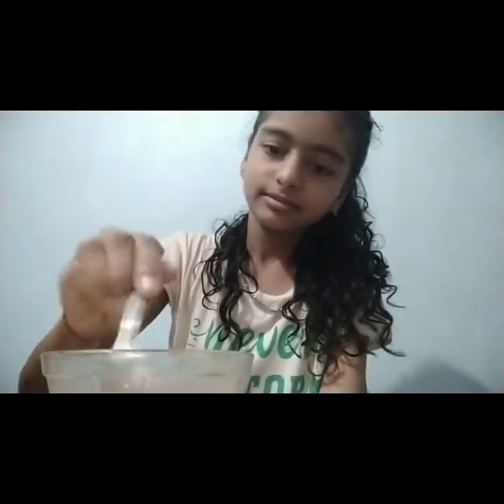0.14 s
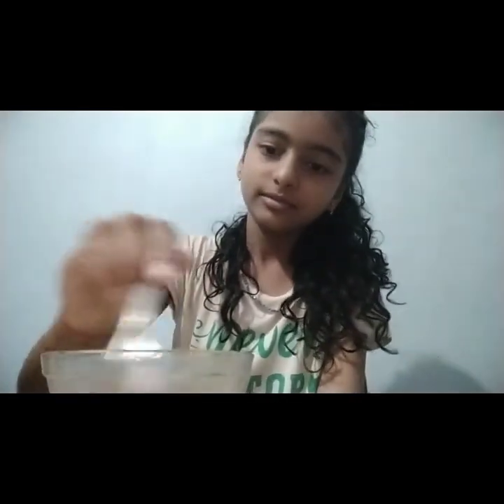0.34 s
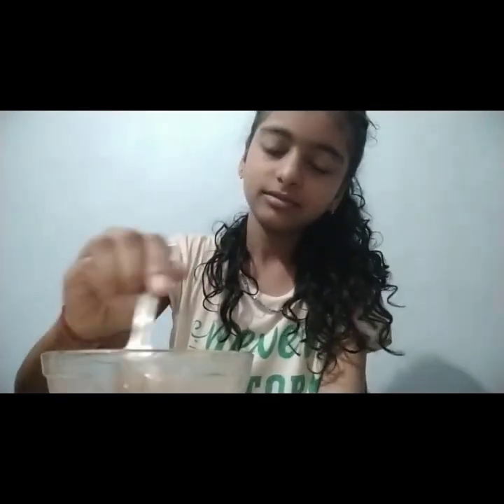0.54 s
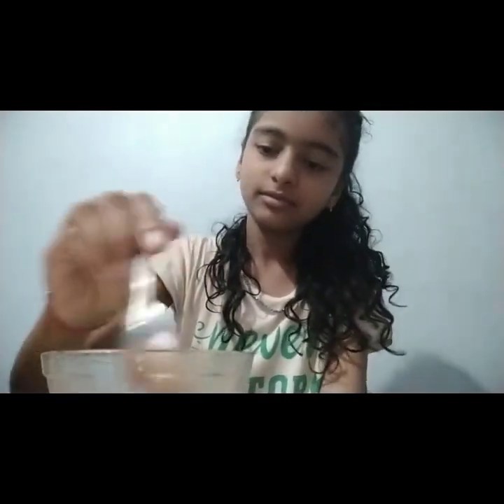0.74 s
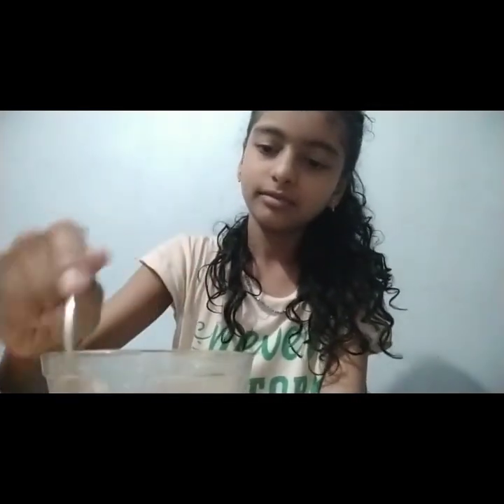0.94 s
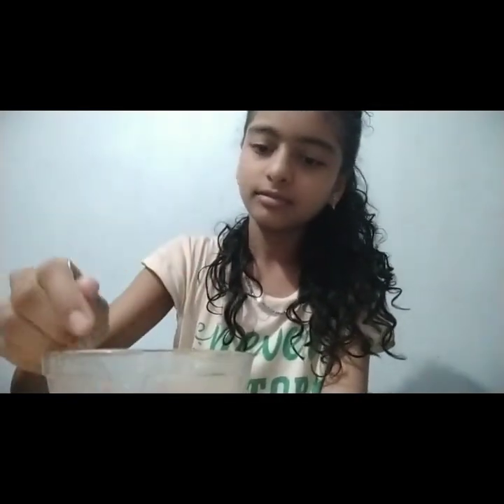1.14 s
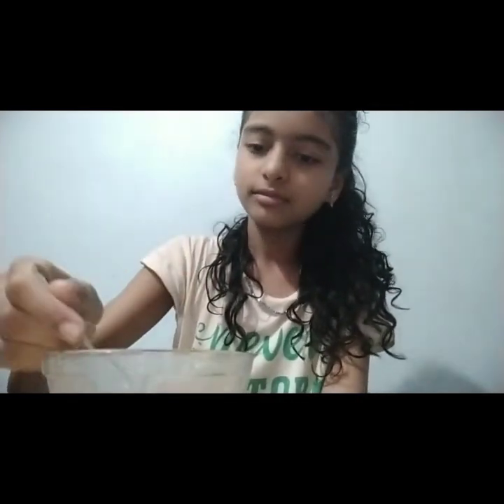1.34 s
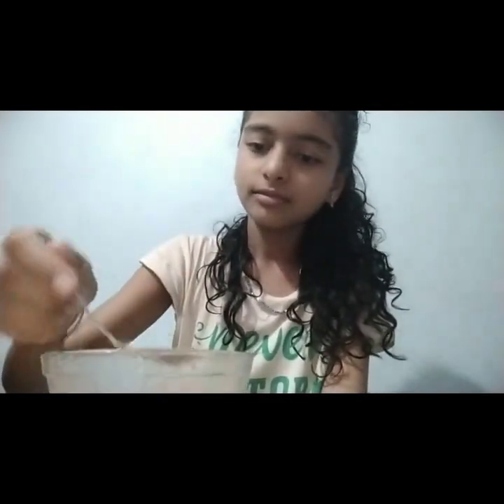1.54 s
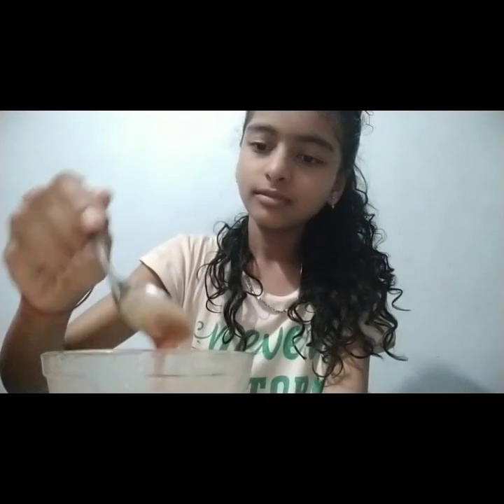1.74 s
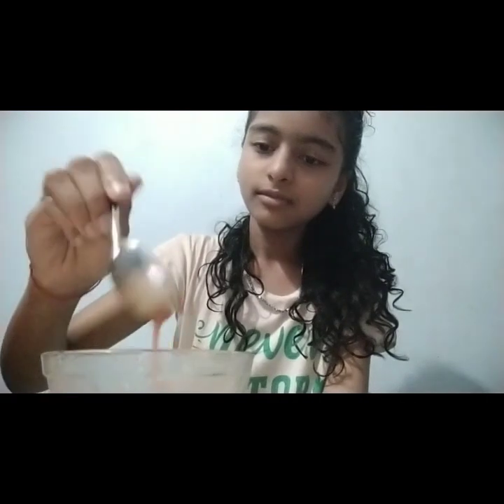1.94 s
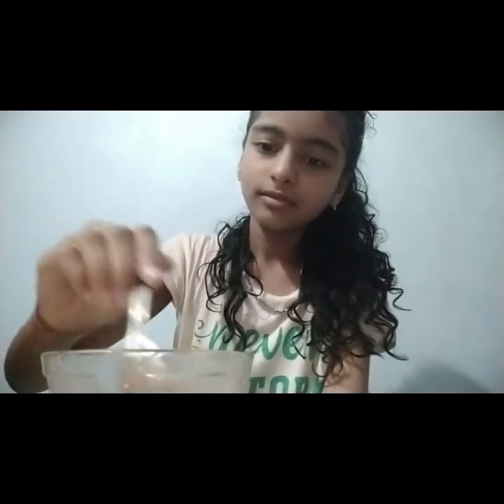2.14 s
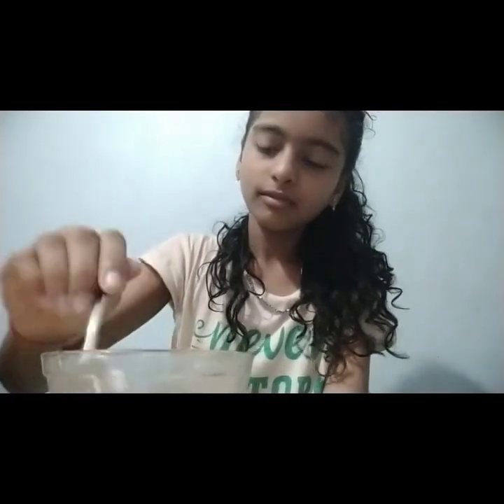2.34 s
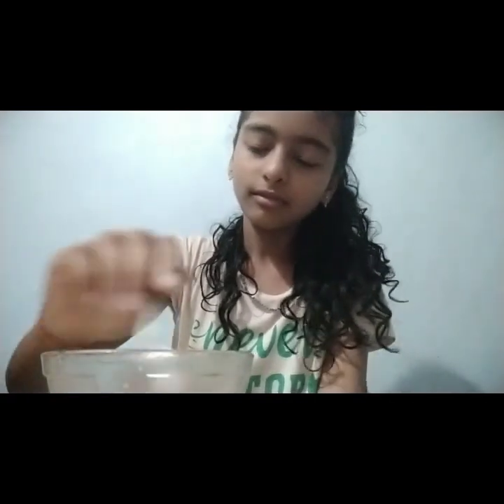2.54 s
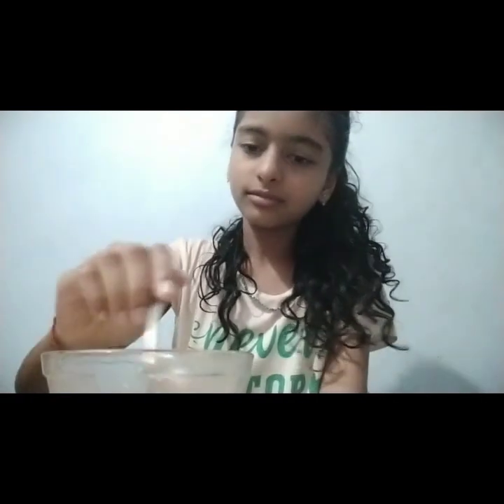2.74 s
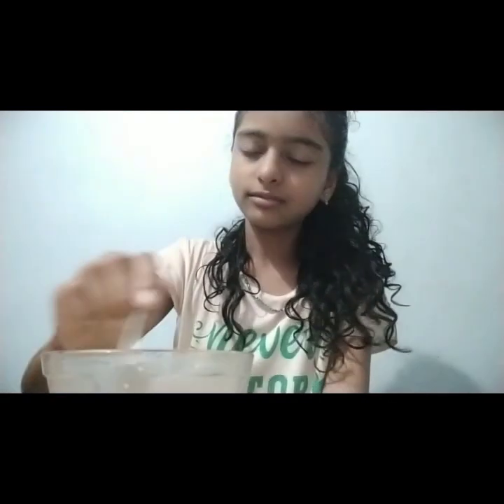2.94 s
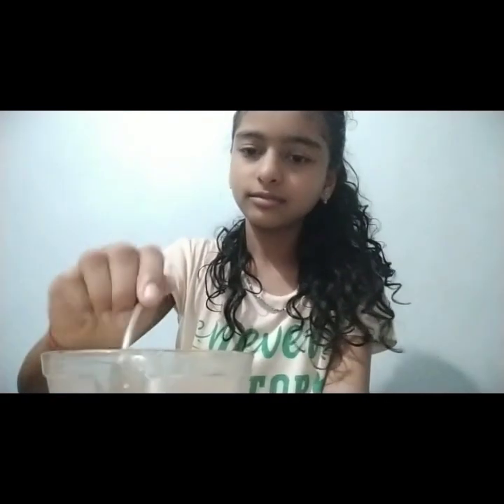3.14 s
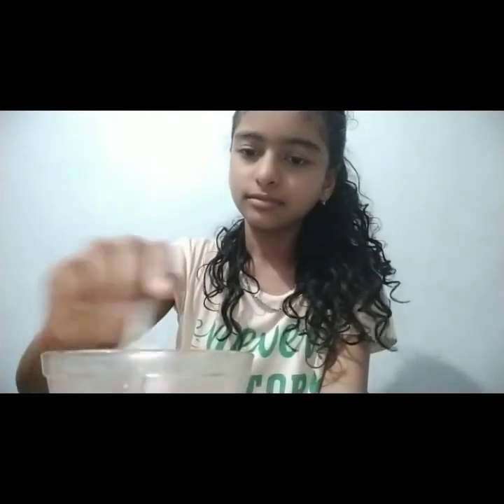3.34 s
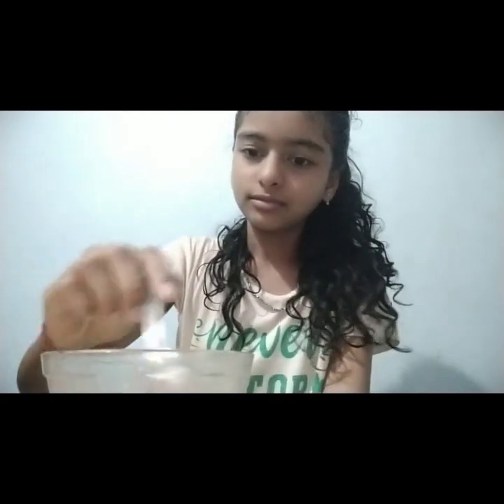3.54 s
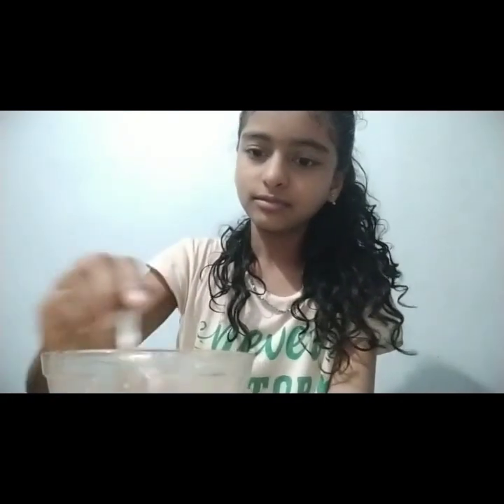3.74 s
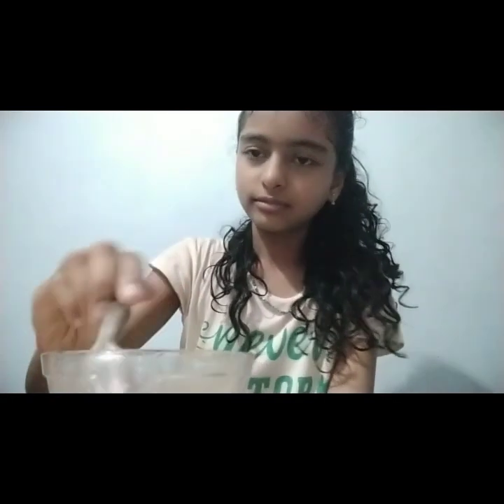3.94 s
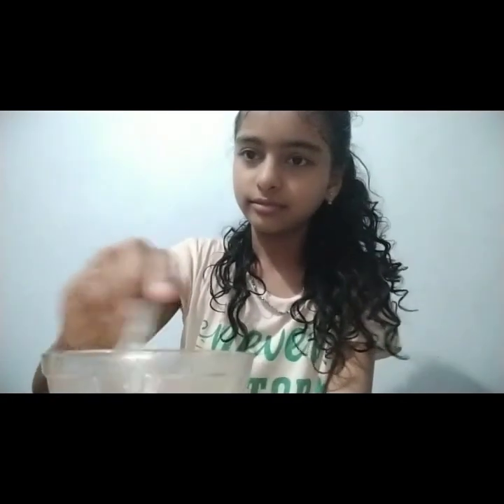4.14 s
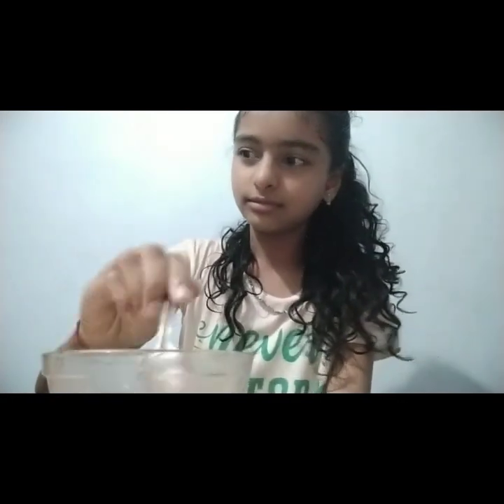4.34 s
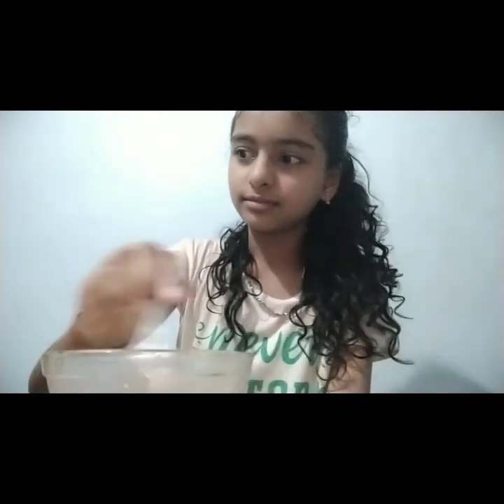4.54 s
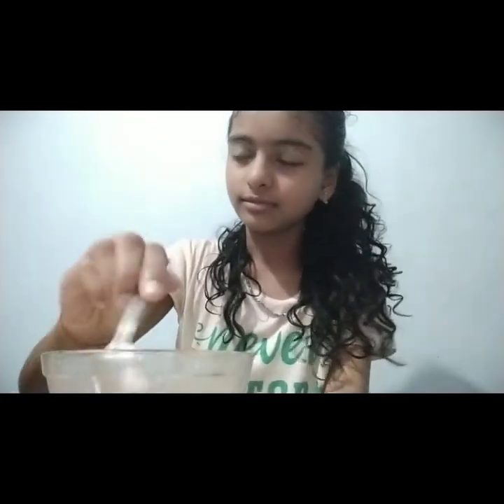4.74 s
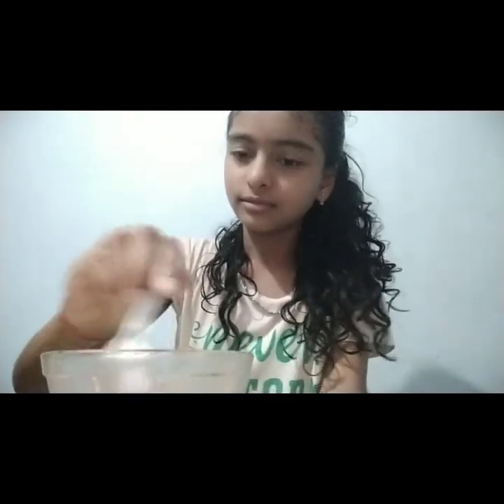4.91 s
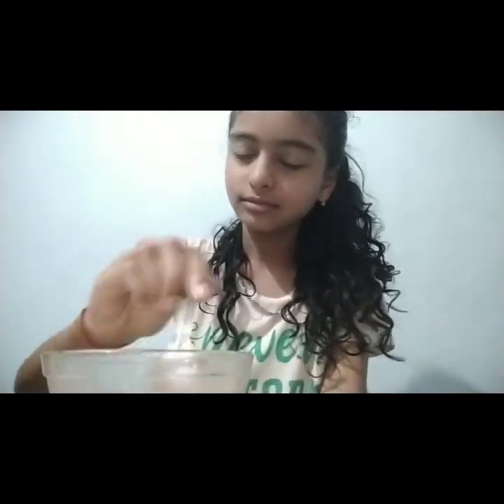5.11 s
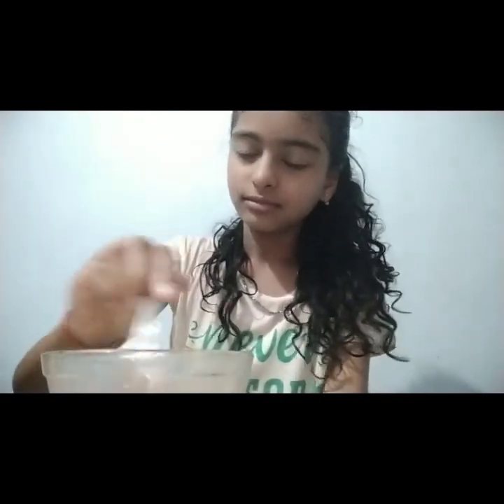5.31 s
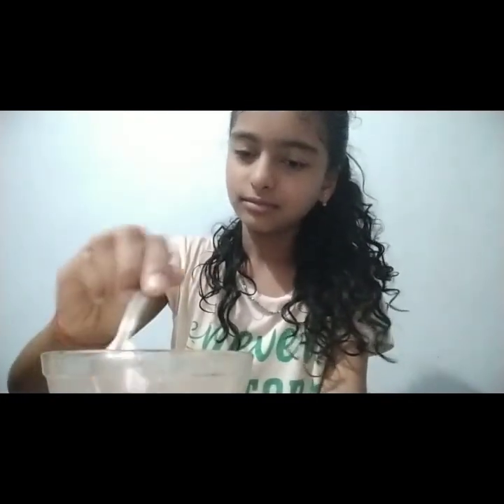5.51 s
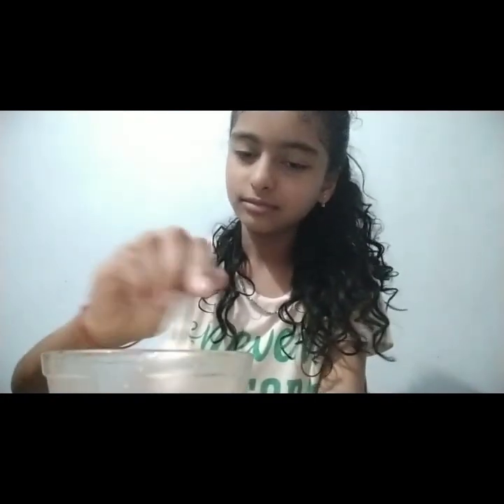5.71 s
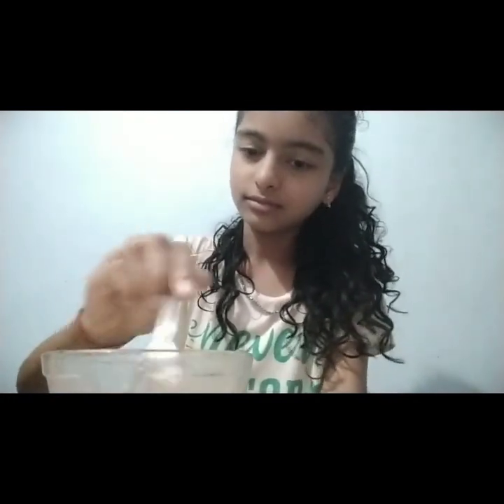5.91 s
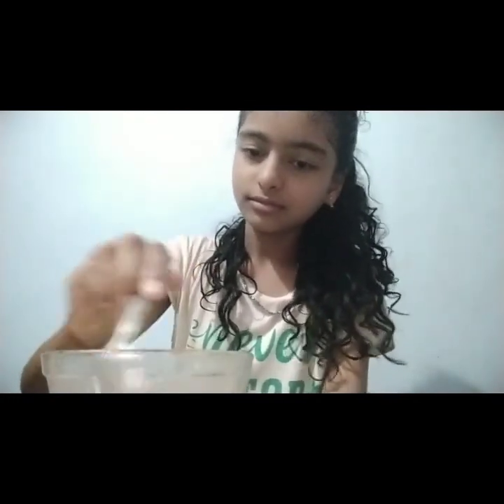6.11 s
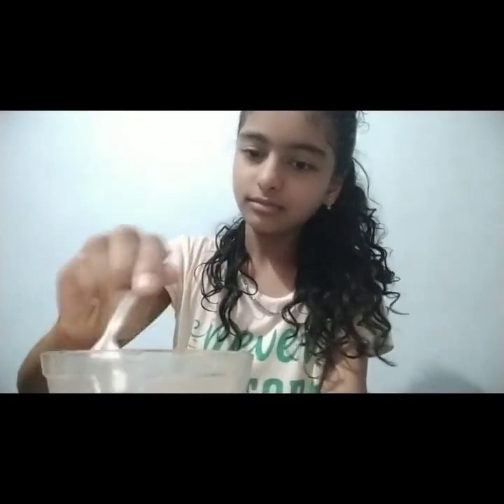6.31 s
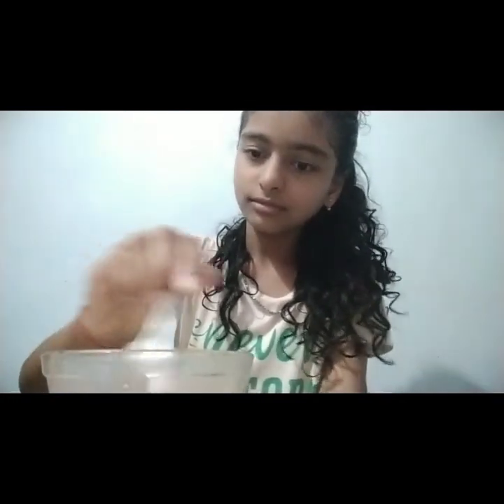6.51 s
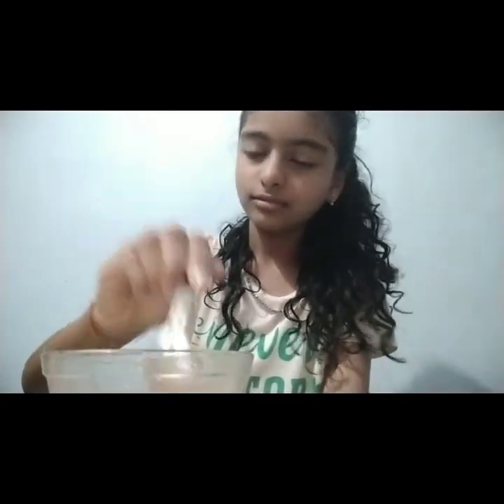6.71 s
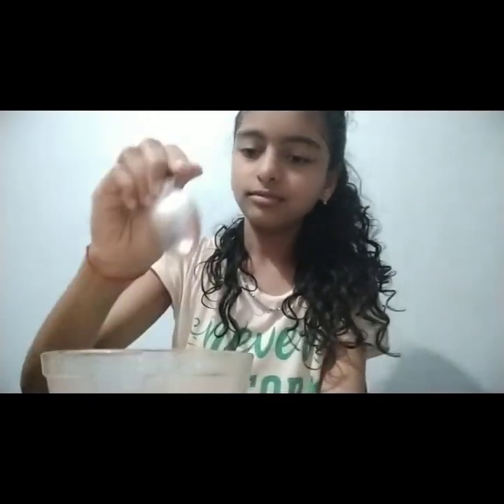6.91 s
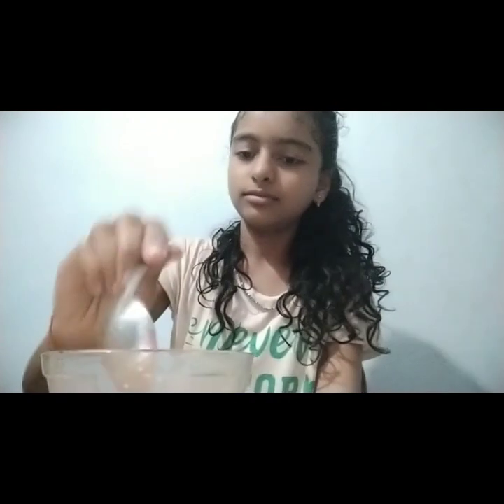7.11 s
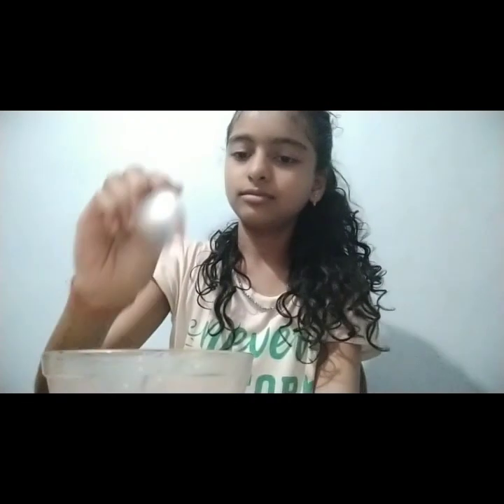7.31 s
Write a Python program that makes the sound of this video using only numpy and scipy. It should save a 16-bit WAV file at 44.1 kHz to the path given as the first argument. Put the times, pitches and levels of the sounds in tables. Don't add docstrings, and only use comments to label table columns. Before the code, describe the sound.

Close stereo sound of a spoon working in a glass bowl of water: uneven clinks, dull submerged knocks, low table thuds and grainy scraping along the bottom. It begins quietly, pauses while the spoon is lifted and drips, then grows denser and brighter. One hard glassy crack far exceeds the rest around five seconds; smaller taps finish. Short hard room reflections, soft microphone hiss and a barely audible whine.

```python
import sys
import numpy as np
from scipy import signal
from scipy.fft import rfft, irfft, next_fast_len
from scipy.io import wavfile
from scipy.ndimage import uniform_filter1d, map_coordinates

SR = 44100
rng = np.random.default_rng(int(sys.argv[2]) if len(sys.argv) > 2 else 0)


def log_audio(samples):
    frames = np.atleast_2d(samples).T
    limited = np.clip(frames, -1, 1)
    pcm = np.round(limited * 32767).astype(np.int16)
    wavfile.write(sys.argv[1], SR, pcm)


def nominal_scale(level):
    x = np.asarray(level, float) / 20
    return 10 ** x


N = 324576


def unit(x):
    return x / np.sqrt(np.mean(x ** 2) + 1e-20)


def along(points, hz):
    point_hz, value = np.transpose(points)
    return np.interp(np.log(hz + 1), np.log(point_hz + 1), value)


def filtered(x, response):
    n = x.shape[-1]
    m = next_fast_len(n + 8192)
    return irfft(rfft(x, m) * response(np.fft.rfftfreq(m, 1 / SR)), m)[..., :n]


def coloured(x, spectrum):
    return filtered(x, lambda hz: nominal_scale(along(spectrum, hz)))


def resonant(x, peaks):
    def response(f):
        total = 0
        for k, (hz, width_hz, db) in enumerate(peaks):
            damping = 1j * f * width_hz
            total = total + (-1) ** k * nominal_scale(db) * damping / (hz * hz - f * f + damping)
        return total
    return filtered(x, response)


def wobble(rate_hz):
    knots = rng.standard_normal(int(N * rate_hz / SR) + 4)
    return map_coordinates(knots, [np.arange(N) * rate_hz / SR])


def place(out, start_s, sound):
    out[:, round((start_s - .0007) * SR):][:, :sound.shape[1]] += sound


def contacts():
    # start_s, bowl_peak_db, relative thud_db, tick_db, ring_db
    blows = [(0.0181, -40, -7, -3.5, -6.5), (0.0896, -38, -14.5, -7.5, -13),
             (0.3326, -32.5, -18.5, -11.5, -30), (0.5472, -35.5, -3.5, -1.5, -39),
             (.63, -35.5, -7, -15, -29), (1.018, -32, -9, 3.5, -21), (1.074, -35, -2.5, -3, -27),
             (2.385, -24, -13.5, -7, -24), (2.435, -18, -21.5, -4.5, -18), (2.9901, -31, -14, 6.5, -8),
             (3.285, -23.5, -16.5, -3.5, -42), (4.116, -24, -21, -10.5, -46), (4.618, -26.5, -10, -15, -20),
             (4.649, -26.5, -4.5, 3.5, -22), (4.8312, -20, -20.5, -12.5, -24), (5.1476, -5, -31, -8.5, -21),
             (5.4976, -27.5, -1, -12, -27), (5.588, -36.5, -2, -2.5, -1), (6.268, -27.5, -16.5, 8.5, -16),
             (6.4201, -33, -1, -0.5, -5), (6.4653, -28.5, -16, -10.5, -44), (6.5097, -45, 4.5, -10, -26),
             (6.7479, -43.5, -6, -6, -21), (6.7764, -44, -7, -4, -23)]
    # start_s, bowl_peak_db, relative thud_db, crack_db, ring_db
    knocks = [(0.193, -39, -28, -17, -10), (0.4231, -35, -6.5, -17, -22), (1.108, -40, -7, -19, -15),
              (2.5015, -33, -8, -14, -10), (2.661, -33, -10.5, -10, -1), (2.7614, -34.5, -8, -22, -13),
              (3.0734, -34, -14.5, -11, -8), (3.1355, -34.5, -10, -16, -21),
              (3.1963, -33.5, -7.5, -2.5, -24), (3.3461, -36.5, -18, -22, -2), (3.364, -30, -38, -21, -16),
              (3.572, -32, -11, -16, -17), (3.697, -28, -12, -14.5, -29), (3.777, -38.5, -13, -12, -26),
              (3.8811, -33, -40, -32, -32), (3.8994, -32.5, -14.5, -15, -4), (4.335, -41, -23, -30, -33),
              (4.705, -24.5, -39, -20, -17), (4.9, -30.5, -16, -3, -33), (5.1011, -28, -3.5, -25, -35),
              (5.436, -36.5, -30, -9, -41), (5.5612, -40, 1.5, -2.5, 7.5), (5.6807, -36.5, -16, -6, -2),
              (5.8556, -42, -4, -4, -1)]
    # start_s, bowl_peak_db, relative crack_db, tick_db
    touches = [(0.2365, -48.5, 6.5, -4), (0.3854, -52.5, 8, 7), (.609, -43, 9, 1), (0.746, -50.5, -5, 11),
               (1.22, -44.5, 1.5, 2), (1.242, -47.5, 11, 10), (1.276, -56, 11.5, 13),
               (1.333, -48.5, -3, -5), (2.95, -50, -1, 9), (3.4978, -56.5, -17, 15), (3.549, -61, -10, 1.5),
               (3.727, -43.5, -2.5, -1), (4.569, -44.5, -18, -2.5), (4.8004, -57.5, -14, 6.5),
               (4.933, -44.5, -2, -3.5), (5.4042, -37.5, 3.5, 6.5), (6.5262, -37.5, -3, -2),
               (6.616, -45.5, -6, -1), (6.649, -44, -7, -9), (6.6633, -41, -6, 1.5)]
    # start_s, bowl_peak_db, relative thud_db, tick_db
    bumps = [(0.2249, -46.5, 6.5, 5), (0.435, -55, 7, 7.5), (1.2335, -38, -4.5, -5.5),
             (1.3682, -55.5, 10, 9.5), (2.578, -47, 2.5, 2), (2.835, -50.5, 2, 8),
             (3.914, -42.5, -3.5, -20), (4.03, -38, -23, -8.5), (4.064, -37, -27, -18),
             (4.1797, -36, 1, -6), (4.2809, -55.5, 12.5, -15), (4.3525, -40.5, 7, -6),
             (4.9847, -61, 19, -16.5), (5.5334, -36.5, 0.5, -9), (5.8111, -42.5, 2.5, -7),
             (6.0327, -48, -2.5, -20), (6.851, -45, -9, -8), (6.972, -59, -5, -17)]

    def crack(tick_db):
        return tick_db - 3

    return ([(s, db, thud, crack(tick), tick, rim_db) for s, db, thud, tick, rim_db in blows]
            + [(s, db, thud, snap, -19.5, rim_db) for s, db, thud, snap, rim_db in knocks]
            + [(s, db, -9, snap, tick, -22.5) for s, db, snap, tick in touches]
            + [(s, db, thud, crack(tick), tick, -24.5) for s, db, thud, tick in bumps])


def ring(modes, t, spread_db):
    shared = rng.standard_normal((len(modes), 1, 1))
    own = rng.standard_normal((len(modes), 2, 1))
    sizes_db = spread_db * (shared + .7 * own)
    total = 0
    for k, (hz, db, t60_s) in enumerate(modes):
        envelope = nominal_scale(db + sizes_db[k] - 60 * t / t60_s)
        total = total + (-1) ** k * envelope * np.sin(2 * np.pi * hz * t)
    return total


def burst(spectrum, t, t60_s):
    noise = rng.standard_normal(len(t)) + 0.75 * rng.standard_normal((2, len(t)))
    return unit(coloured(noise, spectrum)) * nominal_scale(-60 * t / t60_s) * (1 - np.exp(-t / 0.00039))


def taps():
    # hz, level_db, t60_s
    damped_rim = [(1490, -2, 0.012), (1615.5, 4, 0.031), (1530, -15, 0.044), (1712, -7.5, 0.015),
                  (1203, -21.5, 0.046)]
    # hz, level_db, t60_s
    lasting_rim = [(1502, -7, 0.31), (1586, -7, 0.17), (1559, -13, .16), (1643, -10, .2), (1680, -12.5, .1)]
    # hz, level_db, t60_s
    table_modes = [(80.5, -11.5, 0.12), (116, -9.5, 0.1), (160.5, -4.5, 0.17), (209.2, -1, 0.096),
                   (267.4, -1, 0.075), (404, -3.5, 0.022), (651, -12.5, 0.063), (801, -9, 0.046)]
    # hz, density_db_per_hz
    tick_spectrum = [(3820, -65), (6500, -23.5), (7250, -24), (8180, -2.5), (9190, -4), (10100, -1.5),
                     (11400, -5.5), (12700, -34.5), (16000, -25.5)]
    # hz, density_db_per_hz
    crack_spectrum = [(400, -30), (750, -5), (1050, -11), (1900, -5.5), (2800, -5), (3800, -9),
                      (4800, -7.5), (7000, -10), (9000, -50.5)]
    out, t = np.zeros((2, N + SR)), np.arange(SR // 3) / SR
    for s, db, thud_db, crack_db, tick_db, ring_db in contacts():
        sound = ring(damped_rim, t, spread_db=.8) + nominal_scale(ring_db) * ring(lasting_rim, t, spread_db=1.8)
        sound *= nominal_scale(1.0) * (1 - np.exp(-t / 0.00066)) ** 2
        sound += nominal_scale(thud_db + 1.5) * ring(table_modes, t, spread_db=3.5) * (1 - np.exp(-t / 0.00073))
        tick = burst(tick_spectrum, t, t60_s=0.011)
        rattle = nominal_scale(-23.5) * burst(tick_spectrum, t, t60_s=0.14)
        sound += nominal_scale(tick_db + 6.5) * (tick + rattle)
        sound += nominal_scale(crack_db + 3.5) * burst(crack_spectrum, t, t60_s=0.018)
        clack_hz = 2834 * np.exp(0.29 * rng.standard_normal())
        clack = ring([(clack_hz, 0, 0.014)], t, spread_db=3.5) * (1 - np.exp(-t / 0.0017))
        sound += nominal_scale(crack_db + 1.5) * clack
        place(out, s, nominal_scale(db - 6.0) * sound)
    return out[:, :N]


def damped_notes(rows, rise_s, sag=0, sag_s=1):
    out, t = np.zeros((2, N + SR)), np.arange(SR // 2) / SR
    bent = t + sag * sag_s * (1 - np.exp(-t / sag_s))
    for s, hz, db, t60_s, pan_db in rows:
        note = np.sin(2 * np.pi * hz * bent) * nominal_scale(db - 60 * t / t60_s) * (1 - np.exp(-t / rise_s)) ** 2
        place(out, s, note * nominal_scale([[pan_db / 2], [-pan_db / 2]]))
    return out[:, :N]


def clinks():
    # hz, t60_s
    upper_modes = [(3349, 0.33), (5739, 0.22), (8662, 0.22)]
    # start_s, second_peak_db, third_relative_db, second_left_over_right_db, freedom_ratio
    clean_blows = [(0.613, -47, -4.5, 2, 1.1), (1.0167, -35, 5, -10.5, 0.41), (1.077, -43.5, -3, -4, 0.76),
                   (1.3347, -68.5, -3, -2, 2.5), (2.4318, -50.5, 3.5, -16.5, 1.1),
                   (2.7142, -55.5, -10, -5, 0.86), (2.9882, -46.5, 3.3, -12.5, 1.05),
                   (3.1971, -49, -7, 0, 0.9), (3.2844, -50.5, 0.5, 4, 0.6), (4.648, -46, -5, 0, 1.02),
                   (5.1465, -34.5, -9.5, 2.5, 1.02), (5.565, -58.5, -16, 0, 0.7),
                   (6.266, -54, 19.5, -2, 1.02), (6.526, -58.5, 6, 7, 1.05)]
    # start_s, hz, peak_db, t60_s, left_over_right_db
    swings = [(0.305, 1610, -45, .04, 0), (0.365, 1600, -46, .05, 0), (1.0183, 1508, -34, 0.15, -9),
              (1.0183, 1586, -38.5, 0.22, 5), (1.106, 1513, -44, .18, -10), (1.106, 1586, -45.5, 0.19, 3),
              (2.435, 1586, -34, 0.46, 3), (2.435, 1502, -38, 0.34, -2), (2.9896, 1500, -41.5, 0.69, -6),
              (3.1957, 1490, -25.5, 0.019, -12), (4.6492, 1571, -37, 0.36, 6),
              (4.705, 1502, -45.5, 0.5, -0.5), (4.8995, 1450, -31, 0.024, 0), (4.8995, 1558, -50, 0.31, 0),
              (5.1475, 1510, -10.5, 0.063, -2), (5.1475, 1494, -31.5, 0.28, -4),
              (5.1475, 1596, -30.5, 0.34, 2), (5.436, 1490, -27.5, 0.028, 2), (5.5611, 1497, -46, 0.22, 0),
              (5.588, 1505, -43.5, 0.78, -1), (6.272, 1502, -32, 0.27, -7), (6.272, 1586, -40, 0.32, 5),
              (6.5252, 1502, -57, 0.34, -4), (1.335, 1540, -56.5, 0.72, 1)]
    (second_hz, second_s), (third_hz, third_s), (fourth_hz, fourth_s) = upper_modes
    rows = []
    for s, db, third_db, pan_db, free in clean_blows:
        rows.append((s, second_hz, db, free * second_s, pan_db))
        rows.append((s, third_hz, db + third_db, free * third_s, -4.5))
        rows.append((s, fourth_hz, db + third_db - 10.5, free * fourth_s, 0))
    return damped_notes(rows, rise_s=0.0004) + damped_notes(swings, rise_s=0.00054)


def colours():
    # start_s, hz, peak_db, t60_s, left_over_right_db
    clacks = [(0.5468, 1360, -33.5, 0.024, -2), (0.631, 1280, -37.5, 0.027, 0), (1.242, 2500, -48, .02, 0),
              (1.275, 2930, -54, .02, 0), (1.3331, 2800, -47, 0.022, 2), (2.385, 2650, -31.5, 0.017, 6),
              (2.435, 2590, -32, 0.014, 5), (2.5014, 1240, -39, 0.036, -8), (2.579, 1300, -44, 0.037, -8),
              (2.661, 2220, -32, 0.014, 2), (3.697, 2500, -39, 0.017, 7), (4.8995, 2420, -42, .012, -1.5),
              (4.932, 2850, -19.5, .006, 2), (4.932, 3170, -21, .006, 0), (3.1957, 2250, -38, 0.012, 0),
              (3.2847, 2230, -36, 0.0086, 0), (5.4973, 2710, -30, 0.014, .5),
              (6.4202, 2590, -37.5, 0.019, .5), (6.5101, 1540, -37, 0.013, 3), (6.58, 2880, -45, 0.021, 5),
              (6.7483, 2300, -42, 0.016, 5)]
    # start_s, peak_db, hz, left_over_right_db
    edge_pings = [(0.0164, -49, 9300, 2.5), (0.2239, -47, 9500, 0.5), (0.332, -37, 10200, 11),
                  (0.5327, -46, 9600, 4.5), (0.5462, -41, 9050, 2.0), (0.612, -33, 9000, 0),
                  (0.7452, -39, 9300, 1), (1.0157, -43, 9500, 4.0), (1.0715, -41, 10200, 7.0),
                  (1.218, -38.5, 11100, 13), (2.3775, -45, 10400, 13.5), (2.3845, -31, 10800, 18),
                  (2.4343, -20, 10570, 16.5), (2.6615, -36.5, 10300, 18), (2.9326, -45, 10500, 17),
                  (2.9493, -35.5, 10720, 20), (2.986, -25, 10540, 16), (3.1951, -40, 10100, 8.0),
                  (3.283, -35, 10700, 9.5), (3.284, -22, 10500, 18.5), (3.698, -45, 10400, 9.0),
                  (3.728, -33, 10600, 19), (3.899, -43, 10400, 8), (4.116, -34, 10600, 16),
                  (4.1804, -44, 10600, 5.0), (4.2805, -37.5, 10500, 10), (4.3525, -34.5, 10630, 17),
                  (4.618, -35, 10300, 19), (4.6488, -26, 8920, -6), (4.798, -42, 10660, 10),
                  (4.826, -45.5, 10600, 3), (4.8316, -30.5, 10630, 7), (4.8985, -43.5, 10600, 10),
                  (5.1473, -7.5, 9000, -4), (5.4055, -34.5, 10700, 19), (5.4962, -35, 10400, 9),
                  (5.5864, -40, 10450, 12), (5.8556, -51, 11100, 3.5), (6.267, -37, 10600, -3),
                  (6.4208, -22.5, 10500, 14), (6.4657, -39, 10660, 8), (6.5274, -38, 9500, 0.0),
                  (6.649, -38, 10500, 14), (6.6635, -31, 10760, 13), (6.778, -43, 9580, 1.0)]
    # start_s, peak_db, hz, t60_s
    rocking = [(0.226, -45, 194, 0.12), (0.422, -37, 240, 0.2), (0.546, -36.5, 200, 0.25),
               (1.074, -41, 180, 0.12), (1.242, -43, 177, 0.23), (2.386, -41, 213, 0.21),
               (4.176, -32.5, 266, 0.13), (4.354, -28.5, 236, 0.088), (4.614, -44, 223, 0.092),
               (4.65, -35, 214, 0.1), (5.098, -38, 222, 0.12), (5.496, -28, 209, 0.14),
               (5.812, -37, 163, 0.12), (5.859, -39, 95, 0.14), (6.417, -49, 219, 0.12)]
    pings = [(s, hz, db + 2, 0.0076, pan_db) for s, db, hz, pan_db in edge_pings]
    thumps = [(s, hz, db - 5.5, t60_s, 0) for s, db, hz, t60_s in rocking]
    return (damped_notes(clacks, rise_s=0.00068) + damped_notes(pings, rise_s=0.00035)
            + damped_notes(thumps, rise_s=0.0049, sag=0.35, sag_s=0.016))


def swell(start_s, length_s):
    rise_s, fall_s = 0.024, 0.041
    t = np.arange(N) / SR - start_s
    ramp = np.minimum(t / rise_s, 1 + (length_s - t) / fall_s)
    return np.sin(np.pi / 2 * np.clip(ramp, 0, 1)) ** 2


def stirring():
    # start_s, length_s, pressure_db, relative grit_db, table_weight_db
    strokes = [(-.05, 0.099, -61.5, -19, -1), (.19, 0.18, -64, -3, 2), (.49, 0.18, -63.5, 3, 8),
               (1.02, 0.08, -63, 2, 6.5), (1.2, 0.1, -75, 3, 14.5), (1.33, 0.11, -71, 5, 1),
               (2.4, 0.19, -58, 0.5, -21), (2.67, 0.16, -57, -2, -13), (3.08, 0.16, -53, -6.5, -11),
               (3.25, 0.12, -56, -12, -22), (3.46, 0.15, -73.5, 9.5, 6), (3.7, 0.21, -57.5, -3.5, -26),
               (4.03, 0.21, -59.5, -11, -24), (4.27, 0.11, -62.5, -21, -9),
               (4.325, 0.0096, -44.5, -10, -11), (4.39, .08, -60, -8, -10), (4.6, 0.12, -51.5, -26, -4.5),
               (4.79, .22, -65, -9, 1), (5.12, 0.24, -61, -2.5, 4), (5.42, 0.39, -62, -28, 0.5),
               (5.82, 0.11, -59, -1, 0), (5.99, 0.093, -61, -42, 3), (6.27, 0.044, -52, -19, 4),
               (6.4, 0.2, -61, -12, 3), (6.58, 0.26, -63, -3.5, 0.5)]
    # start_s, end_s, pressure_db
    dipped = [
        (-.1, 0.788, -66.5),
        (1.015, 1.54, -73),
        (2.427, 4.491, -63.5),
        (4.549, 5.0, -65),
        (5.045, 6.874, -67),
    ]
    # start_s, length_s, level_db
    trickles = [
        (1.45, .45, -85),
        (1.882, .4, -70.5),
        (6.901, .5, -84.5),
    ]
    power = np.zeros((3, N))
    rests = [(start, end - start, db, -1, 0.5) for start, end, db in dipped]
    for s, length_s, db, grit_db, weight_db in [*strokes, *rests]:
        power += (swell(s, length_s) * nominal_scale([[db], [db + grit_db], [db + weight_db]])) ** 2
    for s, length_s, db in trickles:
        power[1] += (swell(s, length_s) * nominal_scale(db)) ** 2
    return np.sqrt(power)


def grit(rate_hz, spread_db, smooth):
    size_db = spread_db * np.minimum(rng.exponential(size=N), 2.5)
    clicks = (rng.random(N) < rate_hz / SR) * nominal_scale(size_db) * np.sign(rng.standard_normal(N))
    return unit(clicks) + smooth * rng.standard_normal(N)


def patchy(x, depth_db):
    z = signal.stft(x, nperseg=256)[2]
    field = uniform_filter1d(rng.standard_normal(z.shape), size=3, axis=0)
    field = uniform_filter1d(field, size=14, axis=1)
    return unit(signal.istft(z * nominal_scale(depth_db * unit(field)), nperseg=256)[1][:N])


def scattered(x):
    taps_n = 132
    scatter = rng.standard_normal((2, taps_n)) * nominal_scale(-13.0 - np.arange(taps_n) * 0.035)
    scatter[:, 0] = 1
    scatter /= np.linalg.norm(scatter, axis=1, keepdims=True)
    return signal.fftconvolve(x, scatter, axes=1)[:, :N]


def drag():
    # hz, width_hz, level_db
    light_modes = [(776, 82, -24), (2520, 260, -27), (1220, 180, -23), (1502, 9, -1), (1545, 22, -11),
                   (1590, 15, 4), (1680, 50, -17)]
    # hz, width_hz, level_db
    pressed_modes = [(788, 82, -21), (2700, 300, -29), (1245, 250, -23), (1502, 14, -8), (1580, 17, -5),
                     (1625, 26, -1), (1710, 65, -13)]
    # hz, width_hz, level_db
    top_modes = [(111.1, 46, -10.5), (185, 56, 0), (230.7, 65, 0.5), (294.4, 67.5, -1.5), (479, 71, -9.5),
                 (680, 51, -17)]
    # hz, width_hz, level_db
    edge_modes = [(10500, 2200, 0), (11500, 800, -3)]
    # hz, density_db_per_hz
    fizz_spectrum = [(6500, -40), (7500, -14.5), (8200, -10), (9500, -6), (11000, -8.5), (11800, -19.5),
                     (12400, -32.5), (15300, -23), (16000, -57)]
    # hz, density_db_per_hz
    swirl_spectrum = [(1500, -32), (2000, -15.5), (2500, -1), (3300, 2), (4000, -4.5), (4900, -1.5),
                      (5800, -10.5), (6700, -5), (7400, -18), (8500, -33)]
    # time_s, share_ratio
    bite_curve = [
        (0, 0.04),
        (2.3, 0.15),
        (2.5, 0.4),
        (3.4, 1),
        (4.5, 0.46),
        (4.8, 0.04),
        (5.8, 0),
        (6.5, 0.14),
        (7.36, 0.16),
    ]
    t = np.arange(N) / SR
    wall, grains, weight = stirring()
    bite = np.clip(np.interp(t, *np.transpose(bite_curve)), 0, 1)
    pressure = np.clip(wobble(25), -2.5, 1.6)
    rub = grit(rate_hz=160, spread_db=4.0, smooth=0.4)
    fine = rub + grit(rate_hz=900, spread_db=8, smooth=.9)

    drive = patchy(rub, depth_db=4.5) * nominal_scale(2 * pressure)
    slow_pressure = unit(uniform_filter1d(pressure, round(0.063 * SR)))
    firm = 1 / (1 + np.exp(-0.99 * slow_pressure))
    bowl = resonant(drive * (1 - firm), light_modes) + resonant(drive * firm, pressed_modes)
    bowl = unit(bowl) * wall * nominal_scale(5.0)

    scratch = patchy(grit(rate_hz=350, spread_db=5, smooth=.6), depth_db=3)
    edge_pan_db = 12.5
    edge = unit(resonant(resonant(scratch, edge_modes), edge_modes))
    edge = edge * nominal_scale([[edge_pan_db / 2], [-edge_pan_db / 2]])
    fizz = np.sqrt(1 - 0.97 * bite) * patchy(coloured(fine, fizz_spectrum), depth_db=2.0)
    fizz = fizz + nominal_scale(-2) * np.sqrt(bite) * edge
    fizz *= grains * nominal_scale(-3.0 + 3.7 * pressure + 0.66 * wobble(31))

    rumble = unit(resonant(grit(rate_hz=270, spread_db=-1.5, smooth=1.0), top_modes))
    rumble *= weight * nominal_scale(-2.5 + 3.5 * pressure)
    wash = rub + grit(rate_hz=800, spread_db=-4.5, smooth=0.64)
    swirl = patchy(coloured(wash, swirl_spectrum), depth_db=2.5)
    swirl *= grains * nominal_scale(-5.5 - 3.5 * bite + 1.1 * pressure)
    return rumble + bowl + scattered(fizz + swirl)


def kitchen(x):
    # hz, t60_s
    decay = [(200, 0.42), (1500, 0.38), (9000, 0.52), (14000, 0.4)]
    hz, t, z = signal.stft(rng.standard_normal((2, SR // 2)), SR, nperseg=256)
    tail = signal.istft(z * nominal_scale(-60 * t / along(decay, hz)[:, None]), SR, nperseg=256)[1]
    delayed = np.pad(x, ((0, 0), (300, 0)))
    return signal.fftconvolve(delayed, tail / np.linalg.norm(tail[0]), axes=1)[:, :N]


def hiss():
    # hz, density_db_per_hz
    hiss_spectrum = [(8.8, -30), (15, -3.5), (38, -19.5), (77, -25.5), (98, -28), (298, -31), (366, -32.5),
                     (476, -32.5), (584, -33.5), (962, -40), (2840, -47), (7700, -48.5), (11000, -47.5),
                     (12500, -55.5), (14300, -49), (16500, -61)]
    # hz, rms_db
    whine_lines = [(7803, -86)]
    t = np.arange(N) / SR
    whine = 0
    for hz, db in whine_lines:
        whine = whine + np.sqrt(2) * nominal_scale(db + 1.35 * wobble(6)) * np.sin(2 * np.pi * hz * t)
    return nominal_scale(-59) * unit(coloured(rng.standard_normal((2, N)), hiss_spectrum)) + whine


def scene():
    # hz, left_over_right_db
    port_balance = [(100, 1.5), (500, 0.5), (1500, 0), (3400, 0), (5740, -5), (8500, -3), (10500, -1),
                    (12500, 9)]
    # hz, left_lead_rad
    port_lead = [(150, 0), (400, .6), (900, 0), (1600, -.7), (3300, -1.2), (4200, -.3), (5740, 1.5),
                 (9000, -.5)]
    spoon, rings = taps() + drag() + colours(), clinks()
    side = np.array([[.5], [-.5]])

    def port_response(hz):
        return nominal_scale(side * along(port_balance, hz)) * np.exp(1j * along(port_lead, hz) * side)

    ports = filtered(spoon + rings, port_response)
    room = kitchen(spoon + nominal_scale(-9) * rings)
    return ports + nominal_scale(-10.5) * room + hiss()


def top_cut(x):
    return signal.sosfilt(signal.butter(12, 16800, fs=SR, output="sos"), x)


def record(dry):
    top_hz = 15900
    limited = filtered(dry, lambda hz: 1 / (1 + (hz / top_hz) ** 60))
    return top_cut(limited)


dry = scene()
out = record(dry)
log_audio(out)
```